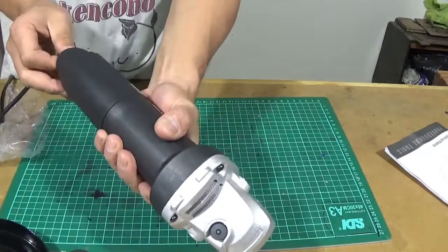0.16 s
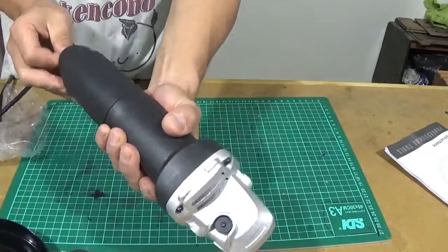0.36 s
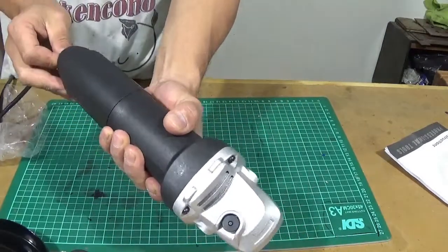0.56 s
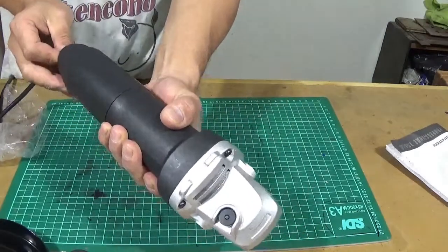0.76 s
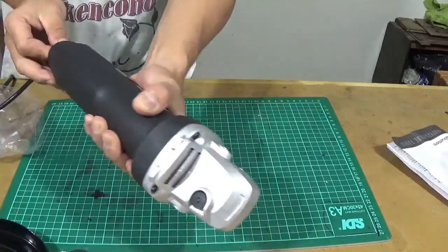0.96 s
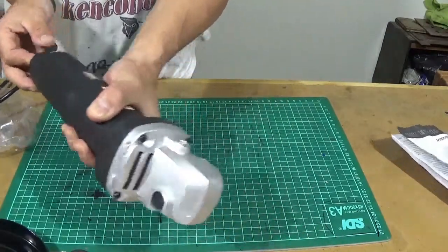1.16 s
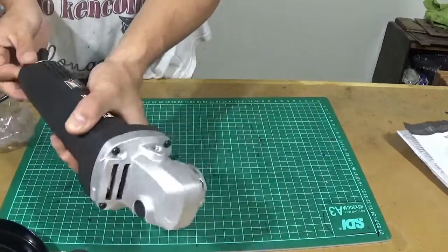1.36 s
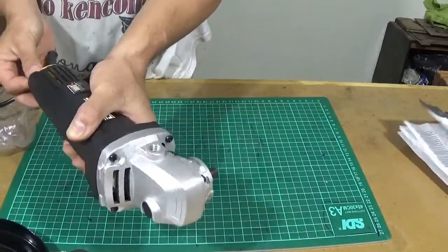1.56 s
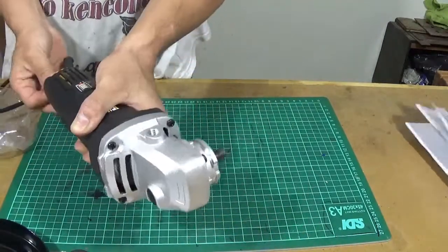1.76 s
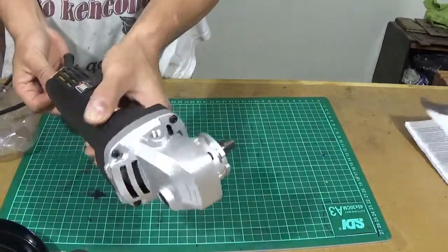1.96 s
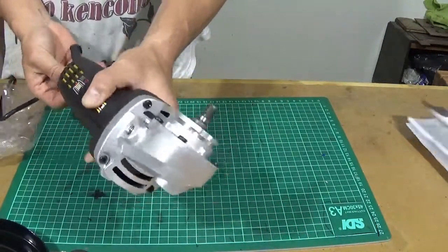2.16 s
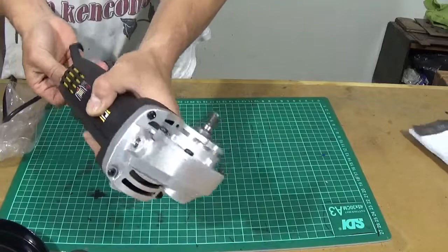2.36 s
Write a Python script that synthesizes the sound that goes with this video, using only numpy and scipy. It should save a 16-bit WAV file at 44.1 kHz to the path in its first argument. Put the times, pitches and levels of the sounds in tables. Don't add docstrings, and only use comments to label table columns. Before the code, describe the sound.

A bare angle grinder close to the microphones: faint finger ticks and cricket chirps, a sharp switch snap, a fast rising roar with whine, a short coasting dip, then a second rise with puffs of fan air.

```python
import sys
import numpy as np
from scipy import signal
from scipy.fft import rfft, irfft
from scipy.io import wavfile
from scipy.ndimage import uniform_filter1d

SR = 44100
rng = np.random.default_rng(int(sys.argv[2]) if len(sys.argv) > 2 else 0)


def natural_amplitude(level_db):
    exponent = np.asarray(level_db, float) / 20
    return 10 ** exponent


def transcribe(u):
    v = np.clip(np.atleast_2d(u).T, -1, 1)
    q = np.round(v * 32767).astype(np.int16)
    wavfile.write(sys.argv[1], SR, q)


N = 110250
T = np.arange(N) / SR
HZ = np.fft.rfftfreq(1024, 1 / SR)
FRAME_S = np.arange(N // 256 + 5) * 256 / SR

# t/s, f/Hz
SHAFT_SPEED = [(.304, 30), (.34, 140), (.4, 290), (.5, 420), (.62, 510), (.72, 556), (.86, 592),
               (1.07, 617), (1.2, 583), (1.4, 533), (1.66, 478), (1.8, 520), (1.94, 568), (2.1, 597),
               (2.27, 624), (2.5, 648)]
# on t/s, off t/s
POWER_ON = [
    (.305, 1.1),
    (1.7, 2.6),
]
# t/s, level/dB
RUSH_LEVEL = [(0.304, -31), (0.316, -21), (.34, -21), (.4, -19), (.6, -17.5), (1.05, -18.5), (1.3, -18.5),
              (1.66, -18.5), (1.9, -18), (2.2, -18.5), (2.5, -18.5)]
# t/s, posture (0 slow, 1 vents, 2 rolled, 3 raised)
POSTURE = [
    (.36, 0.86),
    (.55, 1.64),
    (1.05, 0.95),
    (1.35, 2.14),
    (1.62, 2.1),
    (1.85, 3.8),
]
# f/Hz, level/dB per Hz
SLOW_GEARS = [(35, -65), (60, -40), (208, -62), (690, -16), (978, -12.5), (3780, -1.5), (4500, 4),
              (6240, -25), (11000, -24), (14300, -40.5), (22000, -120)]
# f/Hz, level/dB per Hz
OPEN_VENTS = [(35, -74), (60, -55), (400, -23), (705, -17), (1920, -12), (3540, -5.5), (4400, -8),
              (9440, -6), (11000, -7.5), (14300, -54), (22000, -120)]
# f/Hz, level/dB per Hz
ROLLED_OVER = [(35, -65), (60, -39), (164, -29.5), (487, -19), (936, -14), (2290, -6), (5020, -7.5),
               (9440, -1.5), (11000, -7), (14300, -80), (22000, -120)]
# f/Hz, level/dB per Hz
HEAD_RAISED = [(35, -46), (60, -45), (400, -21), (555, -18), (821, -18.5), (978, -13), (3460, -5),
               (9240, -7.5), (11000, -9), (14300, -63), (22000, -120)]
# f/Hz, width/Hz, then level/dB in postures 0, 1, 2, 3
CASING_RINGS = [(1124, 54, 1, 2.6, 7, 0.8), (2230, 380, 5.4, 2.6, 5, 2.8), (2902, 490, 1.3, 1.8, 7, 2),
                (3854, 790, 1, 2.3, 6, 2.8), (4680, 230, .1, 0.55, 1.7, 1.4), (5210, 120, 6, 2.9, 4, 0.88),
                (5900, 830, 6.2, 2.5, 2, .1), (7540, 950, .1, 1.1, 0.7, 3.2),
                (9400, 1370, .1, 1.9, 2.5, 3.9)]
# multiple of shaft speed, powered level/dB, coasting level/dB, width/Hz
SHAFT_ORDERS = [(1, -50, -49, 25), (6, -29.5, -41, 40), (12, -41, -54, 60)]
ORDER_FLUTTER = [2, 2, 3]
# t/s, level/dB
VENT_FACING = [(.4, -3), (.62, -3), (.8, -2), (.95, -2), (1.07, 2), (1.2, 6), (1.3, 0), (1.7, -1),
               (1.9, -5), (2.1, -3), (2.3, -5), (2.5, -6)]
# t/s, level/dB
LOOSE_GRIP = [(.5, -8), (.66, -6), (.73, 3), (.85, -8), (1., -2), (1.15, -8), (1.3, 3), (1.43, -8),
              (1.55, 1), (1.7, -7), (1.95, 3), (2.08, -9), (2.3, 2), (2.5, 3)]
# f/Hz, level/dB
CASING_OUTLET = [(300, -7), (550, 0), (620, -5), (2900, -8), (3300, -1), (3620, 1), (3800, -5), (7300, 0)]
# f/Hz, width/Hz, level/dB
GEAR_RINGS = [(6400, 260, -22.5), (2950, 300, -32), (3850, 300, -34), (1900, 350, -33)]
# t/s, level/dB, centre f/Hz
SWITCH_SNAPS = [(.2905, -30.5, 6130), (.2945, -27, 4500), (.2955, -29, 7500), (.2978, -8.5, 3460),
                (.2978, -7.5, 6660), (.2978, -18, 9500), (.2995, -26, 1300), (.3028, -10.5, 1880),
                (.3028, -3.5, 4800), (.3028, -17, 6230), (.3028, -10, 7800), (.3035, -22, 835),
                (.306, -20, 1500), (.309, -14, 2370), (.3095, -13, 5900), (.3185, -10, 4400),
                (.3232, -25, 3000)]
# t/s, level/dB, centre f/Hz
FINGER_TICKS = [
    (.002, -43.5, 6030),
    (.038, -47, 5000),
    (.1753, -34, 6500),
    (.1753, -38, 4700),
    (.188, -34, 6430),
    (.188, -42, 3300),
    (.188, -44, 9400),
    (.2, -44, 2220),
    (.2087, -35, 6500),
    (.2087, -42, 5030),
]
# t/s, length t/s, level/dB
AIR_PUFFS = [(2.147, 0.035, -37.5), (2.184, 0.025, -45), (2.201, 0.014, -31), (2.207, .012, -35),
             (2.226, 0.01, -23.5), (2.251, .015, -36), (2.265, 0.014, -34.5), (2.285, 0.018, -37),
             (2.31, 0.017, -28), (2.326, 0.011, -37), (2.346, .03, -45), (2.379, 0.017, -42),
             (2.401, 0.022, -36)]
# f/Hz, level/dB per Hz
WIND_COLOUR = [(24, -61), (40, -18), (236, -8.5), (350, -3.5), (620, -9.5), (923, -21.5), (1500, -21),
               (1950, -44), (3300, -120)]
# f/Hz, likeness 0-1
WIND_LIKENESS = [(100, 0.94), (350, 0.081)]
CHIRP_TIMES = [
    .0179,
    .0573,
    .0977,
    .1396,
    .178,
    .2598,
]
# f/Hz, likeness 0-1
TOOL_LIKENESS = [(60, 0.77), (250, 1), (600, 0.72), (1400, 0.92), (2500, 0.95), (4500, 0.88), (9600, 0.9),
                 (11000, 0.79)]
# f/Hz, lead/rad
LEFT_LEAD = [(100, 0.), (700, .25), (1400, .05), (2400, -.1), (3450, -.35), (5500, -.58), (7600, -.9),
             (11000, -1.45)]
# f/Hz, level/dB
LEFT_LEAN = [(500, -0.4), (1400, -0.1), (4000, -1.2), (11000, -0.4)]
# f/Hz, level/dB per Hz
ROOM_COLOUR = [(18, -81), (30, -45), (101, 4), (149, -15), (187, -3), (329, -11.5), (850, -9.5),
               (2440, -13.5), (3300, -15), (11000, -23), (14300, -76), (22000, -120)]
# f/Hz, likeness 0-1
ROOM_LIKENESS = [(100, 0.93), (300, 0.76), (700, .47), (1400, .15), (2400, 0.3), (4500, 0.48),
                 (11000, 0.78)]
# f/Hz, width/Hz, level/dB
DISTANT_HUM = [(105, 25, -69), (187, 20, -68)]


def evened(x):
    return x / np.sqrt(np.mean(x ** 2) + 1e-20)


def over_time(table):
    return np.interp(T, *np.transpose(table))


def read(points, hz):
    f, value = np.transpose(points)
    return np.interp(np.log(hz + 1), np.log(f + 1), value)


def tone(hz):
    return np.sin(2 * np.pi * np.cumsum(hz) / SR)


def resonate(x, hz, width):
    turn = np.exp(2j * np.pi * np.cumsum(hz * np.ones(x.shape[-1])) / SR)
    r = np.exp(-np.pi * width / SR)
    return 2 * (turn * signal.lfilter([1 - r], [1, -r], x / turn + 1e-18)).real


def resonate_twice(x, hz, width):
    return resonate(resonate(x, hz, width), hz, width)


def pair(x, field_db, same, lead=0):
    a, b = signal.stft(x, nperseg=1024, noverlap=768)[2]
    c = np.clip(same, -1, 1)[:, None]
    left = a * np.exp(1j * lead * np.ones(len(HZ)))[:, None]
    right = c * a + np.sqrt(1 - c ** 2) * b
    z = np.array([left, right]) * natural_amplitude(field_db[:, :left.shape[1]])
    return signal.istft(z, nperseg=1024, noverlap=768)[1][:, :N]


def powered():
    switched = sum((T > on) * (T < off) * 1. for on, off in POWER_ON)
    return uniform_filter1d(switched, size=900)


def throb(depth):
    return 1 + np.clip(depth, 0, 1) * np.cos(2 * np.pi * 100 * (T - .327))


def gear_rattle():
    knocks = (rng.random((N, 2)) < 4000 / SR) * rng.standard_normal((N, 2))
    return knocks * natural_amplitude(3.5 * np.minimum(rng.exponential(1, (N, 2)), 2))


def posture_colours():
    shapes = []
    for k, colour in enumerate([SLOW_GEARS, OPEN_VENTS, ROLLED_OVER, HEAD_RAISED]):
        rings = sum(row[2 + k] * np.exp(-.5 * ((HZ - row[0]) / row[1] * 2) ** 2) for row in CASING_RINGS)
        shapes.append(read(colour, HZ) + rings)
    shapes = np.array(shapes)
    return shapes - 10 * np.log10(np.mean(natural_amplitude(2 * shapes), 1, keepdims=True))


def rush():
    posture = np.clip(np.interp(FRAME_S, *np.transpose(POSTURE)), 0, 3)
    share = np.maximum(1 - abs(posture - np.arange(4)[:, None]), 0)
    patches = rng.standard_normal((len(HZ), len(FRAME_S)))
    patches = evened(uniform_filter1d(uniform_filter1d(patches, size=3, axis=0), size=16, axis=1))
    shaft = np.interp(FRAME_S, *np.transpose(SHAFT_SPEED))
    below_db = -8 * np.clip((shaft - HZ[:, None]) / 60, 0, 1)
    ripple_db = 1.2 * rng.standard_normal((len(HZ), 4)) @ share
    colour_db = posture_colours().T @ share + 1.46 * patches + below_db + ripple_db
    drive = evened(rng.standard_normal((N, 2)) + natural_amplitude(-12) * evened(gear_rattle())).T
    air = pair(drive, colour_db, read(TOOL_LIKENESS, HZ), read(LEFT_LEAD, HZ))
    start = RUSH_LEVEL[0][0]
    depth = powered() * (.02 + .6 * np.exp(-np.maximum(T - start, 0) / .04))
    return air * natural_amplitude(over_time(RUSH_LEVEL)) * np.clip((T - start) / 0.0017, 0, 1) * throb(depth)


def shaft_whine():
    speed, on, out = uniform_filter1d(over_time(SHAFT_SPEED), size=2000), powered(), np.zeros(N)
    for (order, on_db, off_db, width), flutter_db in zip(SHAFT_ORDERS, ORDER_FLUTTER):
        hz = order * speed
        drift = uniform_filter1d(rng.standard_normal(N), size=round(.04 * SR))
        drift = evened(uniform_filter1d(drift, size=900))
        heard_db = flutter_db * np.clip(drift - .5, -3, 1)
        heard_db += over_time(VENT_FACING if order > 1 else LOOSE_GRIP)
        fuzz = evened(resonate_twice(rng.standard_normal(N), hz, width))
        line = evened(.6 * np.sqrt(2) * tone(hz) + .4 * fuzz)
        level_db = heard_db + off_db + (on_db - off_db) * on + read(CASING_OUTLET, hz)
        out += line * natural_amplitude(level_db) * np.minimum(speed / 600, 1) ** 2
    return out


def gear_squeal():
    out = np.zeros(N)
    fade = natural_amplitude(-170 * np.maximum(T - .39, 0))
    fade *= np.clip((T - .308) / 0.0053, 0, 1) * throb(.65)
    for start_hz, width, db in GEAR_RINGS:
        hz = start_hz * (1 - .2 * np.clip(T - SHAFT_SPEED[0][0], 0, .2))
        ring = resonate_twice(rng.standard_normal(N), hz, width) / 20 + .006 * tone(hz)
        out += natural_amplitude(db) * fade * evened(ring)
    return out


def whine():
    return (shaft_whine() + gear_squeal()) * np.clip((T - SHAFT_SPEED[0][0]) / 0.009, 0, 1)


def clicks(rows, decay_s, width):
    out = np.zeros(N)
    t = np.arange(600) / SR
    for s, db, hz in rows:
        spit = rng.standard_normal(600) * np.minimum(t / 0.0004, 1) * np.exp(-t / decay_s)
        edge = np.diff(spit, n=2, prepend=[0, 0])
        click = resonate_twice(spit, hz, width) + 0.078 * edge
        out[round(s * SR):][:600] += natural_amplitude(db) * click / abs(click).max()
    return out


def puffs():
    gust = np.zeros(N)
    for s, length, db in AIR_PUFFS:
        rise = np.clip((T - s) / 0.0036 + 1, 0, 1)
        gust += natural_amplitude(db) * rise * np.exp(-(np.maximum(T - s, 0) / length) ** 2)
    colour_db = read(WIND_COLOUR, HZ)[:, None] + 0 * FRAME_S
    wind = evened(pair(rng.standard_normal((N, 2)).T, colour_db, read(WIND_LIKENESS, HZ)))
    strength = np.sqrt(abs(uniform_filter1d((wind ** 2).mean(0), size=500)))
    blown = wind * gust / (0.17 + strength)
    return signal.sosfilt(signal.butter(2, 110, "high", fs=SR, output="sos"), blown)


def cricket():
    chirp_s = .012
    bursts = sum(np.exp(-((T - s - .004) / (0.28 * chirp_s)) ** 2) for s in CHIRP_TIMES)
    return natural_amplitude(-53) * bursts * np.sin(2 * np.pi * 2850 * T)


def echoes(x, t60, wet_db):
    t = np.arange(8000) / SR
    tail = rng.standard_normal((8000, 2)).T * natural_amplitude(-60 * t / t60) * (t > .002)
    wet = signal.fftconvolve(x[None], tail / np.linalg.norm(tail[0]), axes=1)[:, :N]
    return np.array([np.roll(x, 1), x]) + natural_amplitude(wet_db) * wet


def room():
    hz = np.fft.rfftfreq(N, 1 / SR)
    a, b, low = rfft(rng.standard_normal((N, 3)).T)
    c = np.clip(read(ROOM_LIKENESS, hz), 0, 1)
    left = a * np.exp(1j * read(LEFT_LEAD, hz))
    right = c * a + np.sqrt(1 - c ** 2) * b
    hiss = natural_amplitude(-62) * evened(irfft(np.array([left, right]) * natural_amplitude(read(ROOM_COLOUR, hz)), N))
    hum = np.zeros(N)
    for f, width, db in DISTANT_HUM:
        hum += natural_amplitude(db) * evened(resonate_twice(rng.standard_normal(N), f, width))
    rumble = natural_amplitude(-72) * evened(irfft(low / (1 + (hz / 60) ** 4), N))
    running = np.clip((T - SHAFT_SPEED[0][0]) / 0.018, 0, 1)
    return (hiss + hum) * natural_amplitude(-9.5 * running) + rumble * running


def scene():
    near = whine() + clicks(SWITCH_SNAPS, .0011, 900) + clicks(FINGER_TICKS, .001, 990) + cricket()
    tool = rush() + echoes(near, t60=0.097, wet_db=-13.5)
    lean = natural_amplitude(.5 * read(LEFT_LEAN, np.fft.rfftfreq(N, 1 / SR)))
    return irfft(rfft(tool) * np.array([lean, 1 / lean]), N) + puffs() + room()


def top_cut(x):
    return signal.sosfilt(signal.butter(12, 12050, fs=SR, output="sos"), x)


def record(dry):
    overload = 1.14
    loud = natural_amplitude(0.68) * overload * np.tanh(dry / overload)
    longer = np.concatenate([loud, dry[:, :-400:-1]], 1)
    low_pass = signal.firwin(511, 11050, window=("kaiser", 9), fs=SR)
    finished = signal.oaconvolve(longer, low_pass[None], "same")[:, :N]
    return top_cut(finished)


dry = scene()
out = record(dry)
transcribe(out)
```